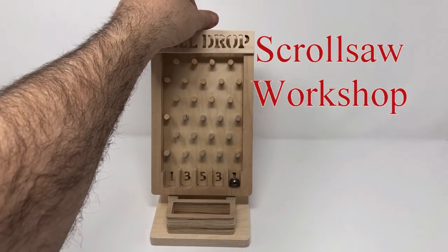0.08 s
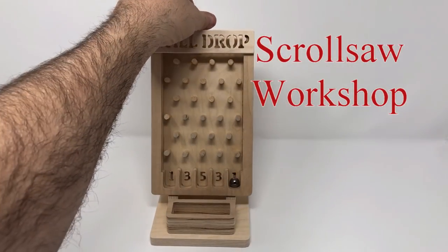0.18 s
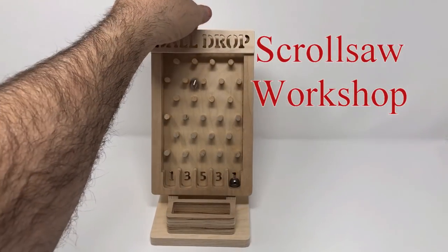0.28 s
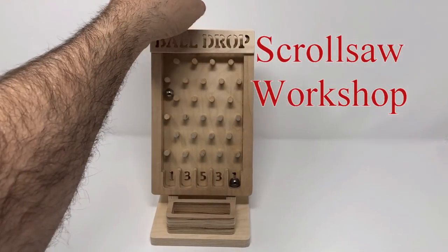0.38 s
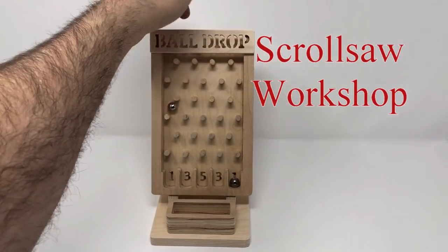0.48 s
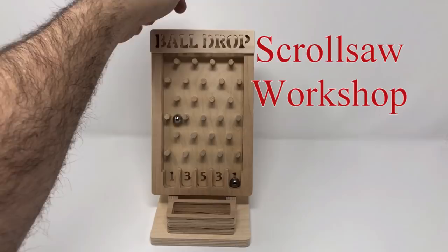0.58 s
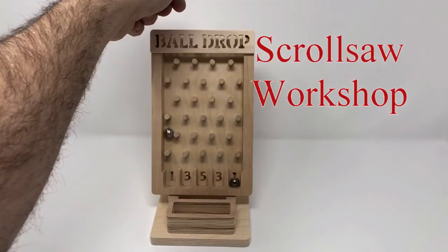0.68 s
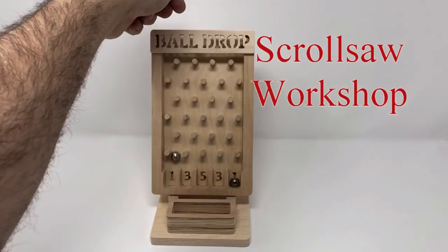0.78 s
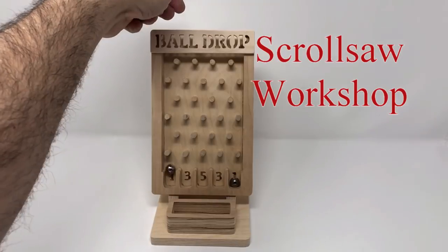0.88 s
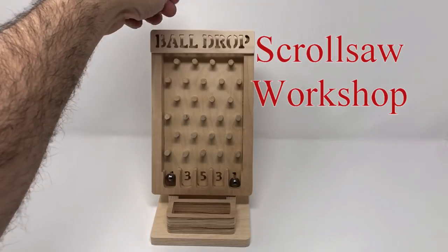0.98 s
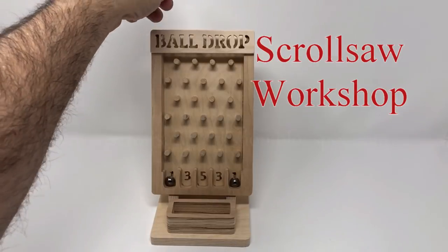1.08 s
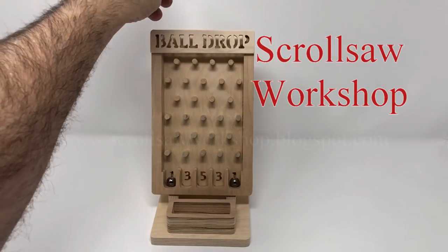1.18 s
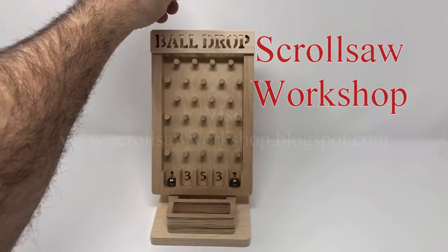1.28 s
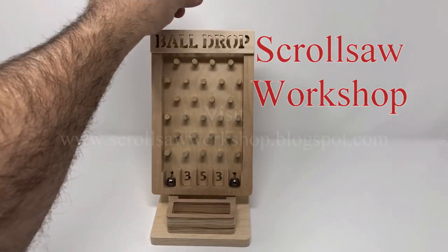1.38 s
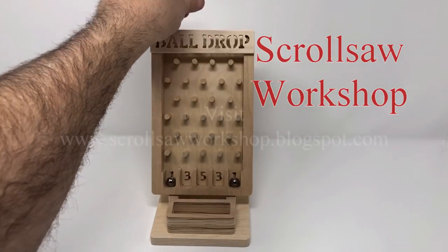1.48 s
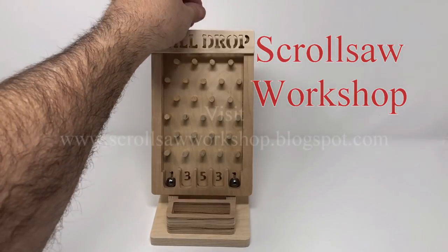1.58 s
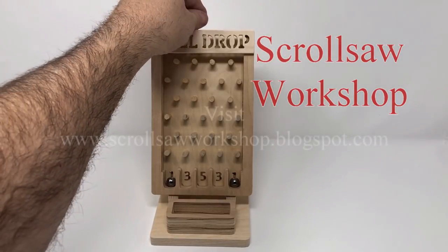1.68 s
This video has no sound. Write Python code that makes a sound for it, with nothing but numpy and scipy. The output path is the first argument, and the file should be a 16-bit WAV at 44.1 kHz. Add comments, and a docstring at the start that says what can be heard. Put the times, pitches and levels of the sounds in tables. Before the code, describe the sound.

Small steel ball clicking quickly down wooden pegs, then dropping into a slot and settling.

```python
"""A steel ball clatters down the pegs of a small wooden board, drops into a slot and bounces to rest.
Every hit makes the back panel and the frame ring; hard hits also rock the stand on the table.
A hand brushes the board before and after. Around it is a small, dry workshop with a low rumble."""
import sys
import numpy as np
from scipy import signal
from scipy.fft import rfft, irfft, next_fast_len
from scipy.io import wavfile

SR = 44100
rng = np.random.default_rng(int(sys.argv[2]) if len(sys.argv) > 2 else 0)


def wav_record(signal):
    """Record a signal, one row per channel, as 16-bit PCM in the file named by sys.argv[1]."""
    frames = np.transpose(np.atleast_2d(signal))
    bounded = np.clip(frames, -1, 1)
    # unit amplitude maps onto the largest positive 16-bit level
    quanta = np.round(bounded * 32767).astype(np.int16)
    wavfile.write(sys.argv[1], SR, quanta)


N = 74970
T = np.arange(SR // 3) / SR  # the seconds that pass during one hit


def amp(db):
    """Turn decibels into a number to multiply a sound by."""
    return 10 ** (np.asarray(db) / 20)


def along(points, hz):
    """Read the value at hz off a curve drawn through (frequency, value) points."""
    freqs, values = np.transpose(points)
    return np.interp(np.log(hz + 1), np.log(freqs + 1), values)


def filtered(x, response):
    """Turn each frequency of x up or down by response(hz)."""
    size = next_fast_len(len(x) + 4096)
    return irfft(rfft(x, size) * response(np.fft.rfftfreq(size, 1 / SR)), size)[:len(x)]


def noise(spectrum, size):
    """Noise of strength 1; the spectrum only sets the balance of low and high."""
    x = filtered(rng.standard_normal(size), lambda hz: amp(along(spectrum, hz)))
    return x / np.sqrt(np.mean(x ** 2) + 1e-20)


def dying(x, fades, size=256):
    """Let each frequency die away at its own speed. A fade time is how long a 60 dB drop takes."""
    hz, t, bands = signal.stft(x, SR, nperseg=size)
    faded = bands * amp(-60 * t / along(fades, hz)[:, None])
    return signal.istft(faded, SR, nperseg=size)[1][:len(x)]


def add(track, s, sound):
    """Mix a sound in at s seconds; a time below 0 counts as 0."""
    i = max(0, round(s * SR))
    track[i:i + len(sound)] += sound[:len(track) - i]


# The rumble's balance of low and high: f/Hz, level/dB
RUMBLE_TONE = [(25, -29.5), (45, -10.5), (62, 2), (95, -10), (190, -8.5), (270, -17.5), (345, -6.5),
               (450, -21.5), (650, -26.5), (1300, -34.5), (2500, -35), (14400, -43.5), (16000, -60.5)]
def rumble(level_db=-53.5):
    """A low, steady noise fills the workshop."""
    return amp(level_db) * noise(RUMBLE_TONE, N)


# Strokes of the hand: t/s, length/s, level/dB
BRUSHES = [(-.03, 0.06989, -58), (0.075, 0.12, -53.5), (.16, 0.17, -50), (1.287, 0.0863, -66.5)]
# The hiss of skin on wood: f/Hz, level/dB
SKIN_TONE = [(200, -17.5), (700, -1), (1280, 2.5), (1700, -4.5), (2300, -17.5), (4000, -10), (7000, -24.5),
             (15000, -32)]
# Hums of the table: t/s, length/s, f/Hz, level/dB
TABLE_HUMS = [(0.103, .18, 78.51, -38.5), (1.597, 0.2405, 84.9, -39.5)]
def hand():
    """Skin brushes the wood, and the table sways under the hand with a low hum."""
    out = np.zeros(N)
    for s, length, db in BRUSHES:
        n = int(length * SR)
        add(out, s, amp(db) * np.hanning(n) * noise(SKIN_TONE, n))
    for s, length, hz, db in TABLE_HUMS:
        n = int(length * SR)
        add(out, s, amp(db) * np.hanning(n) * np.sin(2 * np.pi * hz * np.arange(n) / SR))
    return out


def ringing(notes, force, scatter_db, swell_cycles, attack_s, detune=0.0041):
    """Struck wood rings with several notes at once; each swells quickly, then fades."""
    ring = np.zeros(len(T))
    for k, (hz, db, fade_s) in enumerate(notes):
        # each note's pitch varies slightly at random from hit to hit
        hz = hz * (1 + detune * rng.standard_normal())
        fade_s = min(fade_s, 0.037 + 74.786 / hz)  # wood cannot ring long, least of all on high notes
        swell = 1 - np.exp(-T / (attack_s + swell_cycles / hz))
        level = force(hz) * amp(db + scatter_db * rng.standard_normal() - 60 * T / fade_s)
        direction = (-1) ** k  # neighbouring notes start opposite ways
        ring += direction * level * swell * np.sin(2 * np.pi * hz * T)
    return ring


def hit(notes, grain, force, ring_db, scatter_db, attack_s, punch_db, punch_s, grain_db=9):
    """One hit: clear notes over grain, a blur of short ones. force(hz) is the push each pitch gets."""
    ring = ringing(notes, force, scatter_db, swell_cycles=1.0, attack_s=attack_s)
    burst = filtered(grain, force) * (1 - np.exp(-T / attack_s))
    punch = amp(punch_db * np.exp(-(T / punch_s) ** 2))  # the first moment is a bit louder
    return (amp(ring_db) * ring + amp(grain_db) * burst) * punch


PANEL_HZ, KNOCK_HZ, CLACK_HZ, TICK_HZ = 805.56, 1250, 3655.7, 7483.5  # parts of a hit, low to high
# The ball hits a peg: t/s, panel ring/dB, knock/dB, peg note/dB, clack/dB, tick/dB, treble edge/Hz
PEG_HITS = [(.2442, -13.5, -17, -27, -23.5, -39.5, 9000), (0.2675, -18.5, -26, -43, -39.5, -34, 8359),
            (0.2906, -16.5, -31.5, -37, -67.5, -48.5, 8010), (.3135, -25.5, -42.5, -41, -47, -46.5, 8000),
            (.3255, -23, -38.5, -48, -47, -34, 15000), (.3295, -14.5, -29, -36.5, -42, -37, 8900),
            (.3795, -28, -37, -51, -54.5, -67.5, 8944), (0.3929, -16, -20.5, -26, -33.5, -34.5, 9800),
            (.4495, -16.5, -19, -26.5, -40, -39, 14060), (.4595, -15, -36, -31.5, -37.5, -32.5, 11160),
            (0.4736, -27, -24.5, -53, -36, -61.5, 9000), (.4895, -17.5, -35, -49.5, -46.5, -44.5, 9370),
            (.5140, -23, -35.5, -50.5, -51, -64, 9000), (0.5681, -23.5, -24.5, -24.5, -29.5, -29, 9920),
            (0.5949, -27, -32, -41.5, -52, -42.5, 9600), (0.63, -19, -24.5, -23.5, -29.5, -33.5, 9348),
            (.6478, -18.5, -31.5, -35, -49, -37.5, 8020), (.6685, -22.5, -36.5, -44.5, -44.5, -34.5, 8060),
            (.7060, -23.5, -25, -30, -34, -23.5, 10340), (0.7208, -35, -30.5, -39, -31.5, -49, 10000),
            (0.766, -26.5, -27, -21, -45.5, -57.5, 8076), (.8093, -23.5, -16.5, -23.5, -28, -21.5, 9200),
            (0.825, -26.5, -34.5, -40.5, -36.5, -40, 8740), (.8355, -19.5, -30.5, -25, -39, -47, 8000),
            (.8620, -24, -26.5, -20, -28, -24, 7995), (.8770, -23, -27, -42.5, -35.5, -34, 7868),
            (0.935, -22, -25.5, -24, -48, -45.5, 7927), (.9780, -33.5, -23, -18, -35.5, -45, 8100),
            (1.0120, -34, -31, -26, -51, -58.5, 8000), (1.1060, -23, -29.5, -53.5, -70.5, -72, 8010),
            (1.1490, -30.5, -47, -49, -61.5, -68.5, 8000), (1.3510, -55, -73, -84, -89, -91, 8090)]
# Notes of the board when struck at a peg: f/Hz, level/dB, fade at most/s
BOARD_NOTES = [(729.5, -3.5, 0.1723), (918.21, -1, 0.0737), (1023.2, -14, 0.1), (1095.2, -12, .08),
               (1122.5, -4, 0.03), (1275.2, -6, 0.065), (1546.4, -16.5, 0.025), (1555.7, -12, 0.081),
               (1705.7, 2, 0.03), (1755.9, -3.5, 0.052), (1779.6, -4, 0.032), (1949.9, -19, 0.11),
               (2193.1, -13.5, 0.071), (2884.2, -11, .05), (3189.7, -9.5, 0.064), (3768.5, -1.5, 0.025),
               (4153.9, -7.5, .06), (4518, -3, 0.015)]
# The blur of short notes between those: f/Hz, level/dB
BOARD_GRAIN = [(200, -25.5), (600, -21.5), (740, -15), (1000, 4), (1700, -4.5), (2600, -3), (3500, -1),
               (4300, 2), (5500, -5.5), (8000, -4), (10000, -12.5), (15000, -13)]
# How long the blur lasts, here and in the slot: f/Hz, fade/s
GRAIN_FADES = [(700, 0.091), (2000, 0.08), (4000, 0.045), (8000, 0.050493), (15000, 0.014)]
# A peg's own notes: f/Hz, level/dB, fade at most/s
PEG_NOTES = [(2299.9, 6, 0.043), (2394.5, -9.5, 0.028), (4311.2, -18.5, .045)]
def pegs(scatter_db=1.7138):
    """The ball makes each peg and the board ring; a softer touch has less treble."""
    out = np.zeros(N)
    for s, panel, knock, peg, clack, tick, edge_hz in PEG_HITS:
        tone = [(PANEL_HZ, panel), (KNOCK_HZ, knock), (1850, knock), (CLACK_HZ, clack), (TICK_HZ, tick)]
        force = lambda hz: amp(along(tone, hz)) / np.sqrt(1 + (hz / edge_hz) ** 16)
        grain = dying(noise(BOARD_GRAIN, len(T)), GRAIN_FADES)
        board = hit(BOARD_NOTES, grain, force, ring_db=6, scatter_db=scatter_db,
                    attack_s=0.0011, punch_db=2.0, punch_s=0.010523)
        ping = ringing(PEG_NOTES, lambda hz: amp(peg), scatter_db, swell_cycles=0.884, attack_s=0.0007)
        add(out, s, board + ping)
    return out


# The stand rocks: t/s, level/dB
THUMPS = [(.246, -33.5), (0.329, -40.5), (0.391, -30), (0.451, -46.5), (0.567, -32.5), (0.628, -46.5),
          (.707, -35.5), (.812, -31), (0.902, -32.5), (0.977, -39.5), (1.056, -32), (1.122, -37.5),
          (1.167, -38.5)]
# A thump's balance of low and high: f/Hz, level/dB
THUMP_TONE = [(30, -36), (55, -11), (72, 4.5), (105, -6.5), (185, 1.5), (290, -2), (450, -1.5), (560, -9.5),
              (1200, -50.5)]
# How long a thump lasts: f/Hz, fade/s
THUMP_FADES = [(60, 1), (150, 0.17), (500, 0.39)]
def stand(attack_s=0.001):
    """Hard hits push the stand against the table with a dull thump."""
    out = np.zeros(N)
    for s, db in THUMPS:
        thump = dying(noise(THUMP_TONE, len(T)), THUMP_FADES, size=1024)
        add(out, s, amp(db) * thump * (1 - np.exp(-T / attack_s)))
    return out


# The ball hits the slot's walls and floor: t/s, panel ring/dB, knock/dB, clack/dB, tick/dB
SLOT_HITS = [(.9022, -20.5, -11, -16, -24.5), (.9600, -27.5, -25, -29.5, -32),
             (.9935, -33, -35, -29.5, -37.5), (1.0400, -35.5, -35, -40, -64),
             (1.0527, -18, -16.5, -11.5, -19.5), (1.1228, -25, -20, -16, -30.5),
             (1.1675, -29.5, -23.5, -19.5, -36), (1.1985, -34.5, -27, -23.5, -44),
             (1.2208, -37, -31, -34, -54), (1.2335, -39.5, -32, -31.5, -54), (1.2440, -42, -37, -40, -76.5),
             (1.2520, -67.5, -45, -74.5, -83), (1.2570, -55.5, -50.5, -53, -72)]
# Notes of the board when struck in the slot: f/Hz, level/dB, fade at most/s
SLOT_NOTES = [(726.39, 4, 0.1075), (920.96, -6, .1), (988.12, -3, .09), (1575.8, -10, 0.039),
              (1646.7, -0.5, 0.057), (1761.5, -6.5, 0.15), (1823.7, -9, .05), (2133.9, -4.5, .06),
              (2205.9, 4, 0.043), (2491.4, -15, 0.019), (2839.7, 1.5, 0.041), (3143.8, -9, 0.067),
              (3554.9, -7, .06), (4057.4, 1, 0.074), (4234, 0.5, 0.041), (4458, 3.5, 0.043),
              (5554.8, -3.5, 0.036), (6372, -7.5, 0.11)]
# The blur of short notes between those: f/Hz, level/dB
SLOT_GRAIN = [(200, -27), (600, -24), (740, -4), (1300, -7.5), (1700, -4), (2900, 0), (4300, 0.5),
              (5100, -4.5), (6300, 1), (7500, -13.5), (9000, -1), (12500, -11), (15000, -8.5)]
def slot():
    """The ball strikes the same wood again and again; the last bounces get faster and weaker."""
    out = np.zeros(N)
    grain = dying(noise(SLOT_GRAIN, len(T)), GRAIN_FADES)
    for s, panel, knock, clack, tick in SLOT_HITS:
        tone = [(PANEL_HZ, panel), (KNOCK_HZ, knock), (1900, knock), (CLACK_HZ, clack), (TICK_HZ, tick)]
        force = lambda hz: amp(along(tone, hz))
        add(out, s, hit(SLOT_NOTES, grain, force, ring_db=1.5, scatter_db=0.5105,
                        attack_s=0.001565, punch_db=2.5, punch_s=0.005))
    return out


# Echoes off the table top and the back wall: delay/s, level/dB
ECHOES = [(.0024, -14.5), (0.0133, -19.5)]
def echoes(x, low_cut_hz=1500):
    """Nearby surfaces throw back the bright part of each click."""
    bright = filtered(x, lambda hz: hz ** 4 / (hz ** 4 + low_cut_hz ** 4))
    out = np.zeros(N)
    for s, db in ECHOES:
        add(out, s, amp(db) * bright)
    return out


# How long sound lingers in the workshop: f/Hz, fade/s
ROOM_FADES = [(100, .28), (700, .19), (3000, .17), (8000, 0.14), (15000, 0.12)]
def room(x, level_db=-16, onset_s=0.0065):
    """Many faint echoes blend into a short tail behind each sound."""
    tail = dying(rng.standard_normal(len(T)), ROOM_FADES) * (1 - np.exp(-(T / onset_s) ** 2))
    return amp(level_db) * signal.fftconvolve(x, tail / np.linalg.norm(tail))[:N]


def scene():
    """Ball, stand and hand, with their echoes and the rumble, in one channel."""
    board = pegs() + slot() + stand() + hand()
    return (board + echoes(board) + room(board) + rumble())[None]


# How strongly the microphone picks up each pitch: f/Hz, level/dB
MIC_TONE = [(1000, -3.5), (14800, -3.5), (15600, -17.5), (16500, -33)]
def record(dry, top_hz=16500):
    """The microphone dulls the highest treble and hears nothing above top_hz."""
    return filtered(dry[0], lambda hz: amp(along(MIC_TONE, hz)) * (hz < top_hz))[None]


dry = scene()
out = record(dry)
wav_record(out)
```